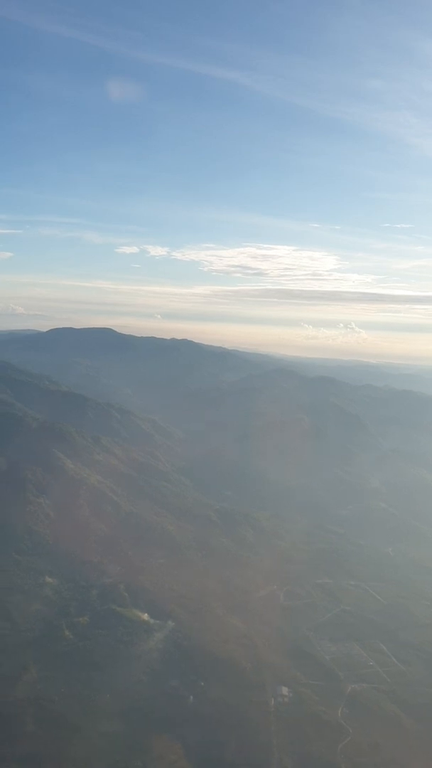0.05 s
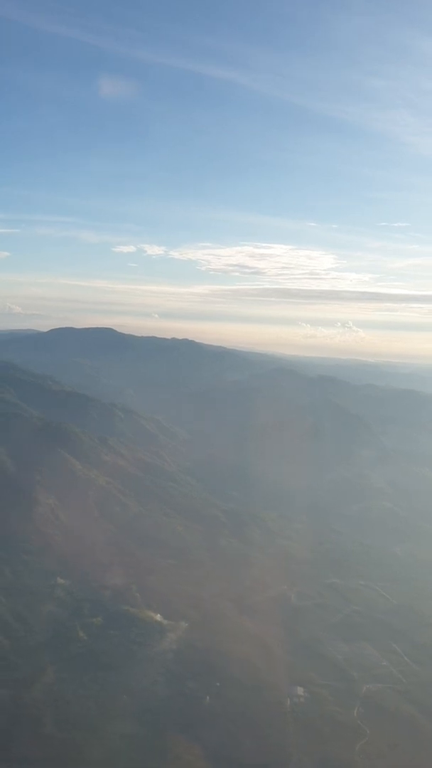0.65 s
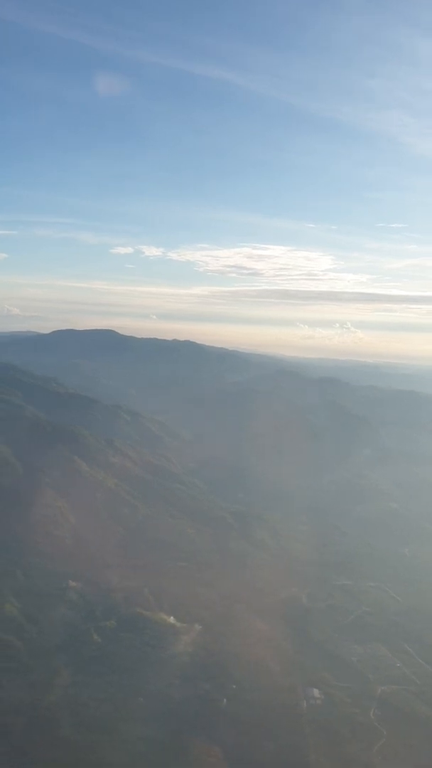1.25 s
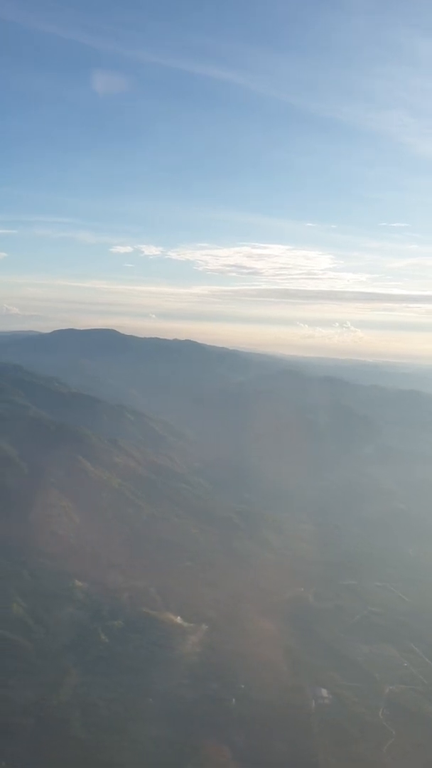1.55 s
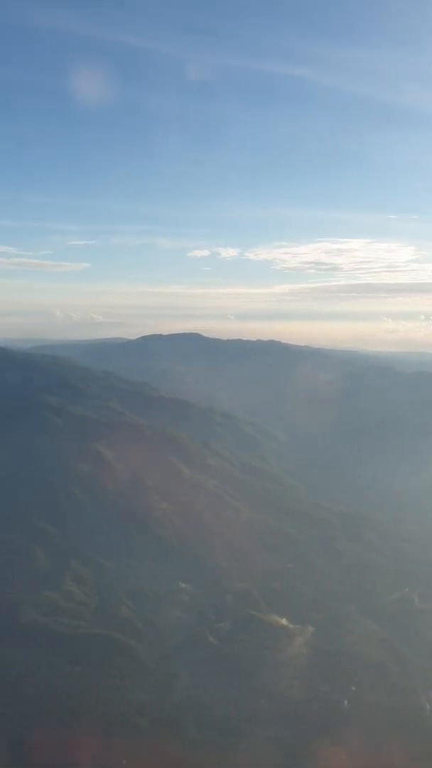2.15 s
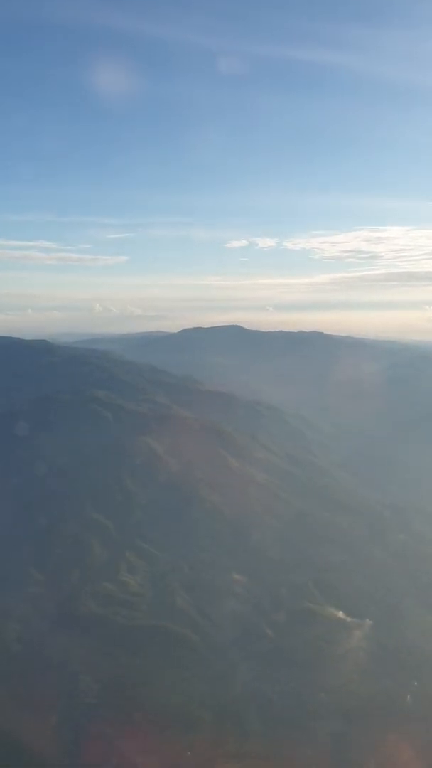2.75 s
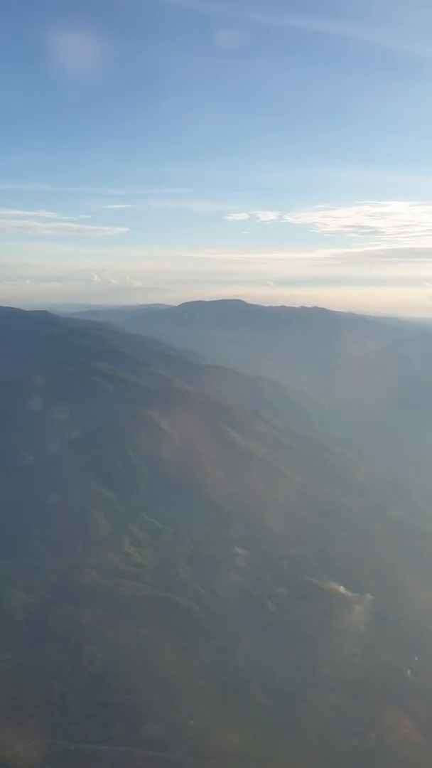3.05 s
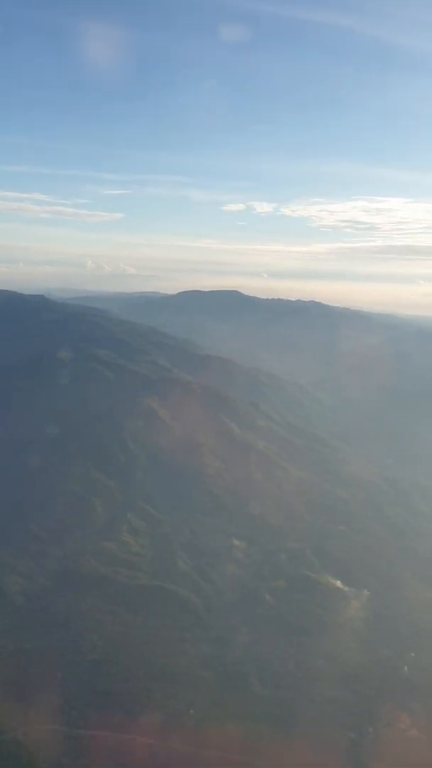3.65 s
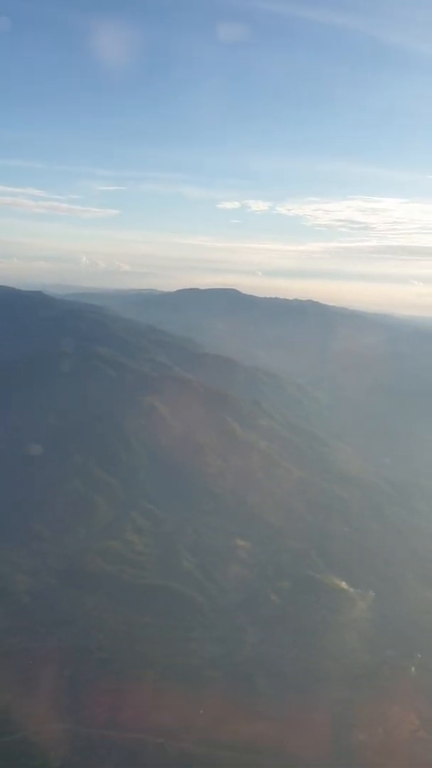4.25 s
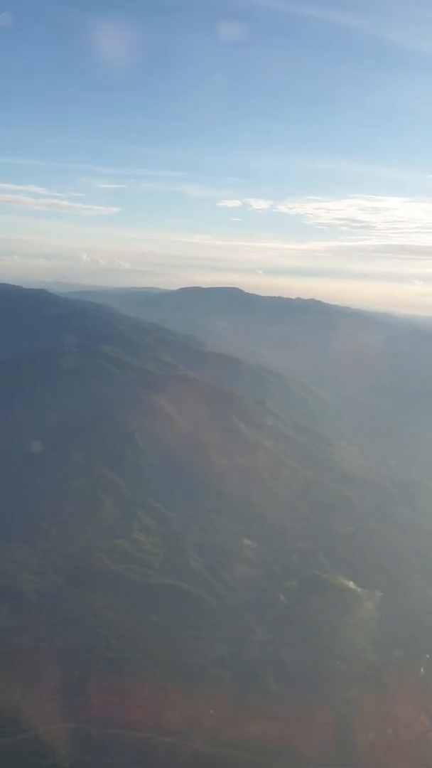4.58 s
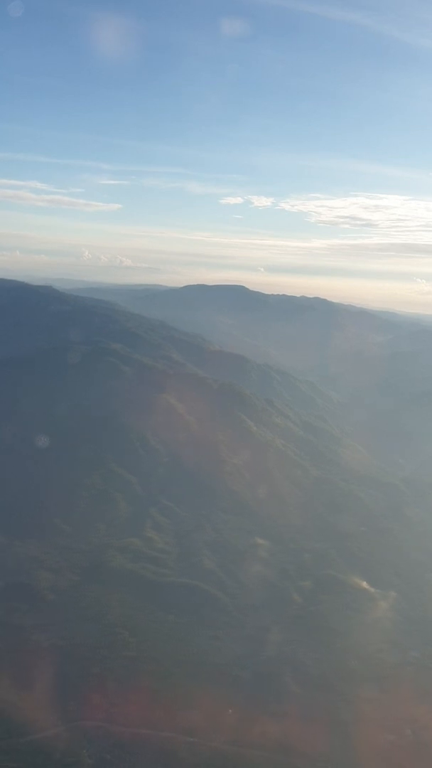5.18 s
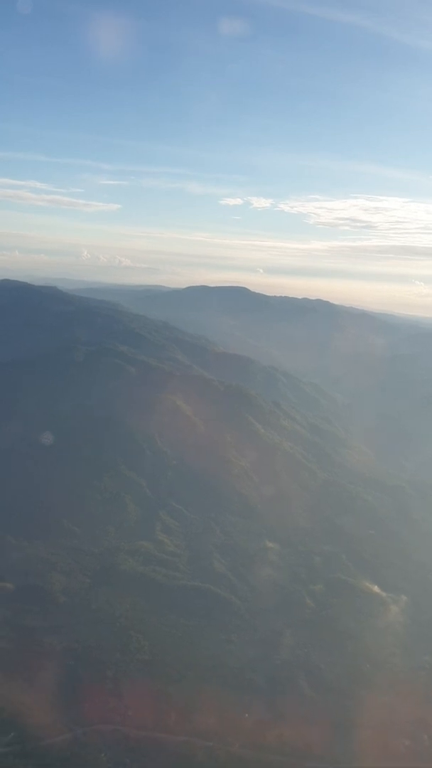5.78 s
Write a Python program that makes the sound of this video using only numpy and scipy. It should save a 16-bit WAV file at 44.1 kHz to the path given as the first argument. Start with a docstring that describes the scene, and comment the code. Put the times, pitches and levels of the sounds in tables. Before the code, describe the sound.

Jet engines drone low and steady through an airliner's hull, under rushing air and a light hiss from the vents.

```python
"""Inside an airliner in flight, at a window seat. The engines send a deep, even rumble through the
hull and make the cabin panels boom. Air rushing along the outside adds a wide roar, and the
ventilation hisses, with faint whistles and a fine fizz. The hiss rings in the window recess and
changes colour as a hand-held camera moves there; each shift of the hand makes a soft swish."""
import sys
import numpy as np
from scipy.fft import rfft, irfft, next_fast_len
from scipy.io import wavfile
from scipy.ndimage import map_coordinates

SR = 44100
rng = np.random.default_rng(int(sys.argv[2]) if len(sys.argv) > 2 else 0)


def unload_audio(sound):
    """Save the sound as a 16-bit wav file, at the path given as the first command line argument."""
    columns = np.transpose(np.atleast_2d(sound))
    # keep every value between -1 and 1, then stretch to whole-number steps
    steps = np.round(np.clip(columns, -1, 1) * 32767)
    wavfile.write(sys.argv[1], SR, steps.astype(np.int16))


N = 256647
REST_PLACE = 0.74  # the spot in the recess where the camera's place adds no gain to hiss or fizz
LEFT_ONLY = np.array([[1], [0]])


def engines(right_db):
    """The engines shake the hull and the panels boom; such long waves reach both microphones in step."""
    # tone of the rumble through the hull: pitch_hz, level_db
    rumble_tone = [(20, -77), (30, -70), (42, -45.5), (57, -38), (92, -35), (120, -37.5), (155, -34),
                   (187, -43), (213, -38.5), (305, -43), (365, -45), (435, -56.5), (600, -81.5),
                   (1100, -100)]
    # booming cabin panels: pitch_hz, width_hz, level_db
    panels = [(339.7, 21.9, -42.5), (489.5, 43, -57)]
    # slow swell of rumble and boom: time_s, gain_db
    swell = [(0, .3), (.8, .5), (1.8, -1), (2.4, 0.45), (4.4, 0.24), (5.8, 0.6)]
    rumble = shape_tone(white_noise(channels=1), rumble_tone)
    boom = sum(gain(db) * resonance(white_noise(channels=1), hz, width) for hz, width, db in panels)
    return (rumble + boom) * gain(over_time(swell)) * gain([[0], [right_db]])


def slipstream(right_db):
    """Air tumbling along the outside shakes the whole wall, so its roar is wide."""
    # tone of the air on the plane's skin: pitch_hz, level_db
    roar_tone = [(20, -90), (90, -46), (300, -65), (430, -62.5), (580, -65.5), (720, -64.5), (850, -72),
                 (1050, -76), (1400, -79), (2500, -90.5), (6000, -115)]
    return shape_tone(noise_at_mics(direct_share=0.32), roar_tone) * gain([[0], [right_db]])


def ventilation():
    """Air from the ducts hisses through the cabin and bounces off the window and the seat."""
    # tone of the hiss on the cabin side (left): pitch_hz, level_db
    cabin_tone = [(600, -105), (1500, -86), (2100, -79), (3300, -76), (4250, -76), (4700, -83), (6600, -82),
                  (7650, -82), (8400, -88.5), (9800, -98), (11300, -92), (13000, -108)]
    # tone of the hiss on the window side (right): pitch_hz, level_db
    window_tone = [(600, -108), (1500, -84.5), (2000, -81), (2800, -86), (3600, -76.5), (4300, -83),
                   (5700, -91), (7200, -90.5), (8400, -88.5), (9900, -99), (11700, -101), (13000, -110)]
    left, right = noise_at_mics(direct_share=0.44)
    sides = [shape_tone(left, cabin_tone), shape_tone(right, window_tone)]
    hiss = [near_echoes(side, strength=0.18, longest_s=0.012, drift_s=0.000324, count=5)
            for side in sides]
    place_db = 1.2 * (camera_place() - REST_PLACE)
    hand_db = -1.5 * hand_motion() ** 2 * LEFT_ONLY  # the hand shields the left microphone
    return np.array(hiss) * gain(place_db + hand_db)


def window_recess():
    """Hiss rings in the recess; each pitch has loud and quiet spots that the camera moves through."""
    # standing waves, with spots on the 0-1 scale of camera_place:
    # pitch_hz, width_hz, left_db, right_db, loud_spot, spot_spacing
    standing_waves = [(2280, 132, -79.5, -81, 0.69, 0.86), (2885, 158, -75, -84.5, 0.22, 0.79),
                      (3635, 160, -77.5, -85, 0.92, 0.74), (4110, 160, -77.5, -91, 0, .68),
                      (7150, 220, -82, -100, 0.16, 0.98)]
    place = camera_place()
    rings = 0
    for hz, width, left_db, right_db, loud_spot, spacing in standing_waves:
        spot_db = 4.5 * np.cos(2 * np.pi * (place - loud_spot) / spacing)
        ring = resonance(white_noise(channels=2), hz, width)
        rings += ring * gain([[left_db], [right_db]]) * gain(spot_db)
    hand_db = -10 * hand_motion() ** 2 * LEFT_ONLY  # the hand shields the left microphone
    return rings * gain(hand_db)


def duct_whistles(right_db):
    """Air rushing past the grilles sings faintly at a few pitches."""
    # breathy whistles of the ducts: pitch_hz, width_hz, level_db
    whistles = [(1660, 29, -76), (1978, 28, -78.5), (2124, 30, -75), (2304, 26, -73), (2845, 26, -75),
                (3120, 27, -75), (5260, 42, -83.5), (5990, 110, -80.5)]
    singing = sum(gain(db) * resonance(noise_at_mics(direct_share=0.38), hz, width)
                  for hz, width, db in whistles)
    return singing * gain([[0], [right_db]])


def nozzle_fizz():
    """The nozzles beam their fizz: it grows as the camera moves across and as the hand brushes by."""
    # tone of the air nozzles' finest fizz: pitch_hz, level_db
    fizz_tone = [(5000, -115), (9000, -99), (11500, -97.5), (13200, -99), (15700, -100)]
    facing_db = np.outer((1, 3), camera_place() - REST_PLACE)  # left, right
    brush_db = 4 * hand_motion() * LEFT_ONLY
    return shape_tone(white_noise(channels=2), fizz_tone) * gain(facing_db + brush_db)


def hand_swish(pitch_hz, width_hz, full_shift_db):
    """The hand sliding on the camera makes a brief, high rush on the left."""
    rush = resonance(white_noise(channels=1), pitch_hz, width_hz)
    return gain(full_shift_db) * hand_motion() * rush * LEFT_ONLY


def hand_motion():
    """How fast the hand slides on the camera: each shift swells and fades like a bell curve."""
    # shifts of the hand: middle_s, half_length_s, strength (0-1)
    shifts = [(.1, .35, 0.3), (2.292, .13, 1), (2.7, 0.17, 0.45)]
    t = np.arange(N) / SR
    return sum(strength * np.exp(-((t - middle_s) / half_s) ** 2)
               for middle_s, half_s, strength in shifts)


def camera_place():
    """Where the camera is at each moment, from 0 at one side of the recess to 1 at the other."""
    # the camera's path across the recess: time_s, place (0-1)
    path = [(0, 0.0089), (1.2, 0.064), (1.95, .32), (2.3, 0.75), (2.75, 0.83), (3.25, 1), (3.9, 0.9),
            (4.7, 0.8), (5.8, 0.82)]
    return over_time(path)


def near_echoes(sound, strength, longest_s, drift_s, count):
    """Weak echoes from close surfaces lift some pitches and dull others, sliding as the camera drifts."""
    n = np.arange(N)
    mix = sound.copy()
    for distance, speed, polarity in rng.uniform(-1, 1, (count, 3)):
        delay_s = longest_s * (2 + distance) / 3 + drift_s * speed * n / N
        echo = map_coordinates(sound, [n - delay_s * SR], order=3)
        mix += strength * np.sign(polarity) * echo
    return mix / np.sqrt(1 + count * strength ** 2)


def noise_at_mics(direct_share):
    """Noise at both microphones: a share comes straight from the right, the rest from all around."""
    lag_s = [[18 / SR], [0]]  # the left microphone hears it later
    direct = filtered(white_noise(channels=1), lambda hz: np.exp(-2j * np.pi * hz * lag_s))
    return np.sqrt(direct_share) * direct + np.sqrt(1 - direct_share) * white_noise(channels=2)


def white_noise(channels):
    """A separate noise for each channel, at 0 dB per Hz."""
    return rng.standard_normal((channels, N)) * np.sqrt(SR / 2)


def shape_tone(sound, points):
    """Shape a sound along (pitch_hz, level_db) points; above the last it drops 60 dB an octave."""
    pitches, levels = np.transpose(points)

    def response(hz):
        level_db = np.interp(np.log(hz + 1), np.log(pitches), levels)
        octaves_above = np.log2(np.maximum(hz / pitches[-1], 1))
        return gain(level_db - 60 * octaves_above)
    return filtered(sound, response)


def resonance(sound, pitch_hz, width_hz):
    """Let one pitch through at full strength and cut steeply on both sides of it."""
    def band(hz):
        return 2j * hz * width_hz / (pitch_hz ** 2 - hz ** 2 + 2j * hz * width_hz)
    return filtered(sound, lambda hz: band(hz) ** 2)


def filtered(sound, response):
    """Multiply each frequency in the sound by response(hz)."""
    size = next_fast_len(N + SR // 2)
    hz = np.fft.rfftfreq(size, 1 / SR)
    return irfft(rfft(sound, size) * response(hz), size)[..., :N]


def over_time(points):
    """Join (time_s, value) points with straight lines, giving one value per sample."""
    times, values = np.transpose(points)
    return np.interp(np.arange(N) / SR, times, values)


def gain(db):
    """Turn decibels into a multiplier."""
    return 10 ** (np.asarray(db) / 20)


def scene():
    """All the sounds of the cabin together, as left and right channels."""
    air = ventilation() + duct_whistles(right_db=-4.5) + window_recess() + nozzle_fizz()
    swish = hand_swish(pitch_hz=11400, width_hz=1200, full_shift_db=-92)
    return engines(right_db=-4.0) + slipstream(right_db=-5.5) + air + swish


def record(dry):
    """The camera cuts off the very highest treble."""
    return filtered(dry, lambda hz: hz < 15780)


dry = scene()
out = record(dry)
unload_audio(out)
```